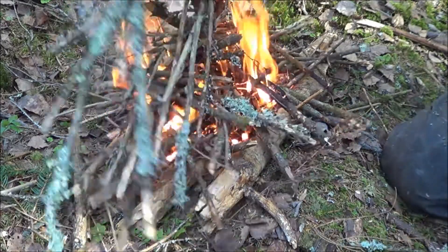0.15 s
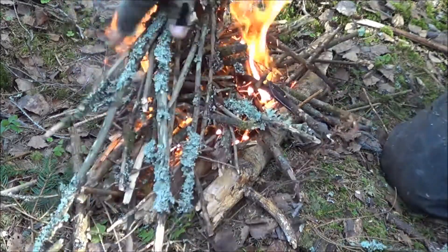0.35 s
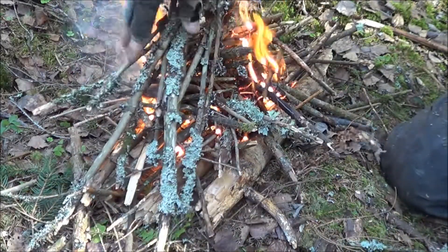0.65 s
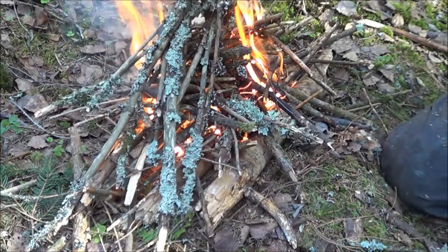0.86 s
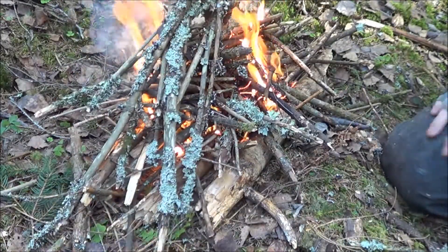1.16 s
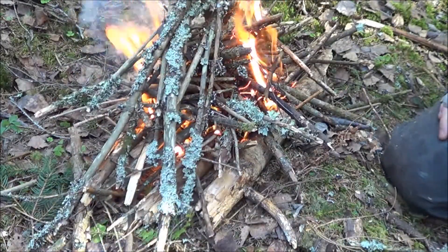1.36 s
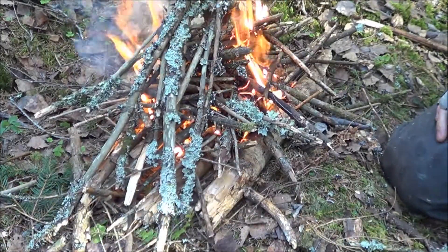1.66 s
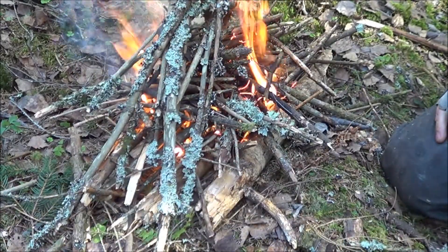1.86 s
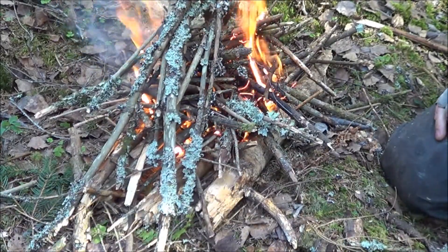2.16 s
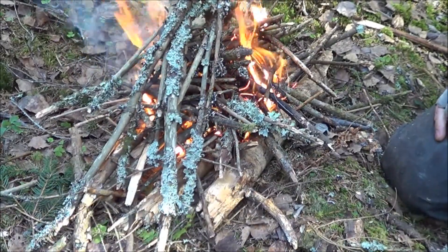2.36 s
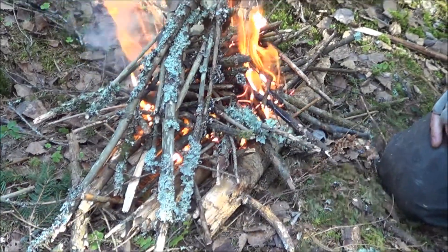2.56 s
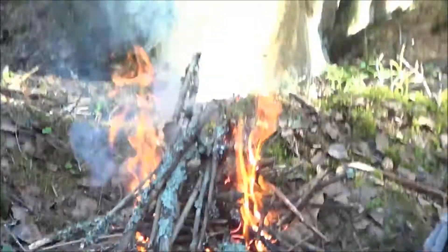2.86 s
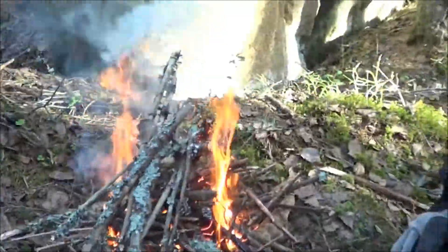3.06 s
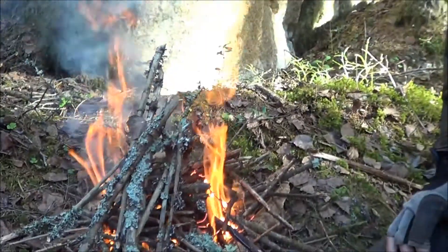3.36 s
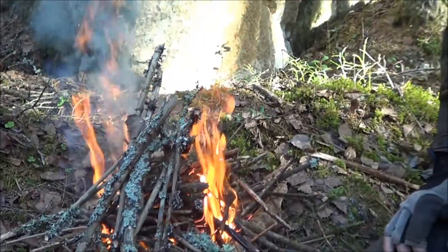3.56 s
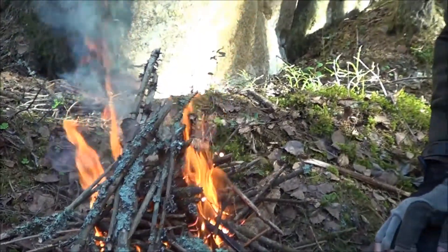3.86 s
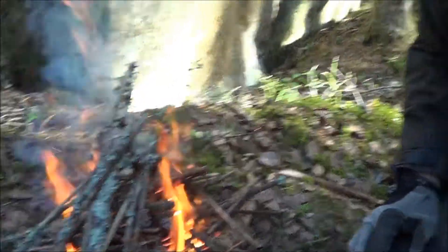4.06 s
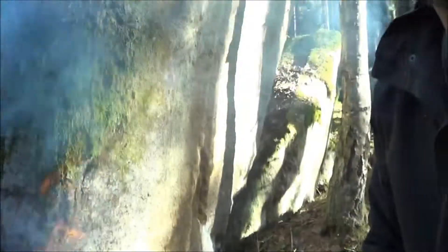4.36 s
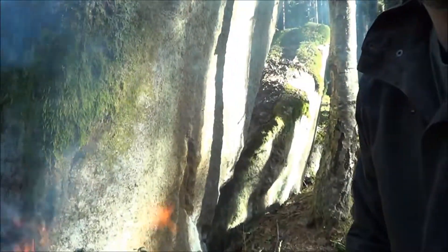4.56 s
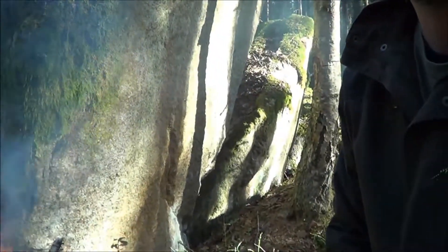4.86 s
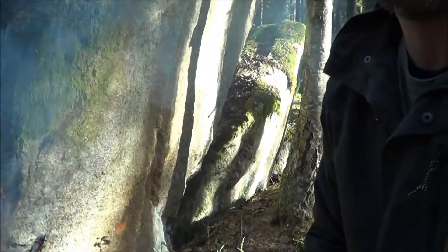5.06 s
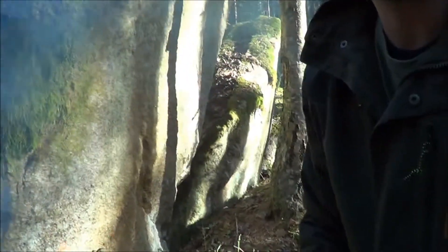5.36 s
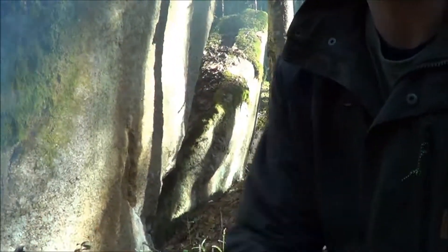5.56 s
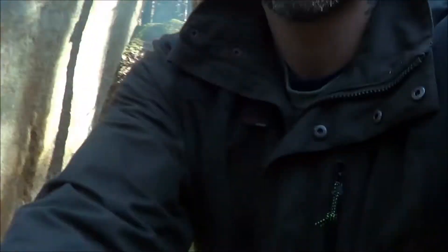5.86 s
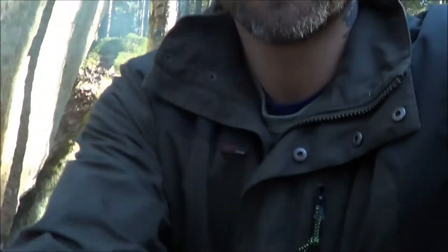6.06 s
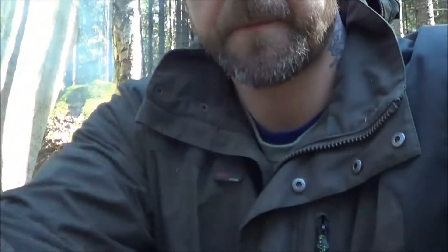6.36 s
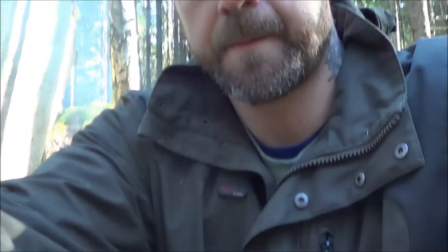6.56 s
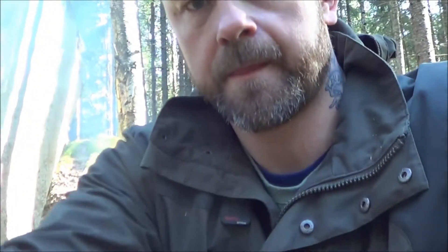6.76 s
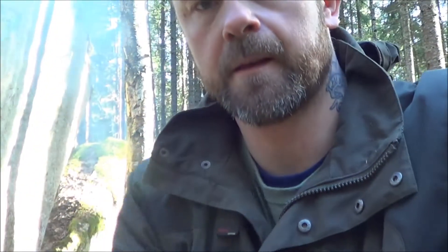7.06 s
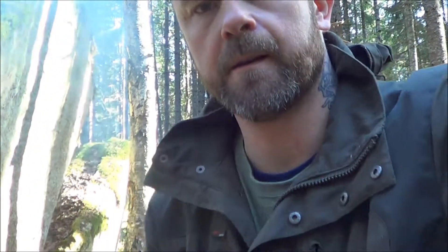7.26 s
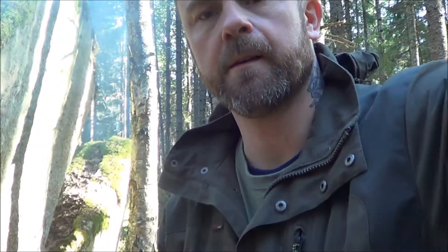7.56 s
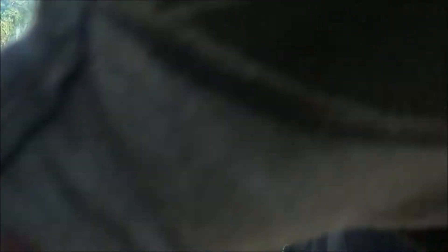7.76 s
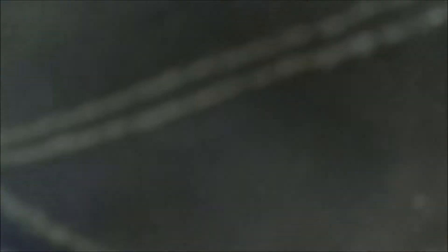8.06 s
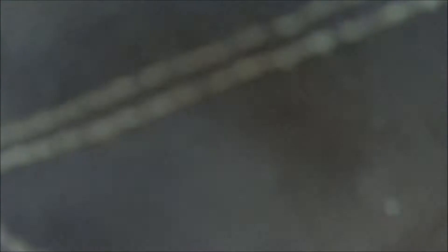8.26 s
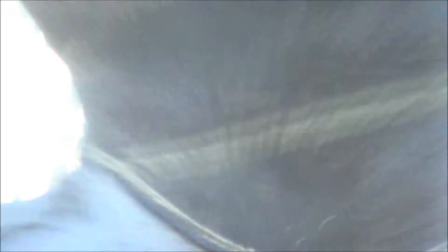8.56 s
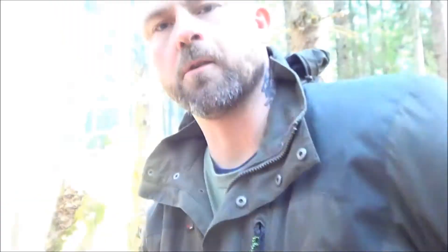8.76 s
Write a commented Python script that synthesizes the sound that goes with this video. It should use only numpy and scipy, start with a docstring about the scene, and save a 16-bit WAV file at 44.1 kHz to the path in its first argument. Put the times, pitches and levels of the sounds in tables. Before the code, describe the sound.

Close to a small wood fire in a forest, twigs snap brightly and irregularly with faint ticks between. Quick sleeve swishes come first as sticks are laid on; then fingers rub, scrape, knock and briefly squeak on the hand-held camera as it is lifted and turned. Soft air hiss and low flame flutter stay underneath, with very faint bird peeps late on.

```python
"""A small stick fire on a forest floor, close to the two microphone ports of a hand-held camera.
Resin pockets burst and twigs crack: sharp noise bursts through resonances, with a short forest echo.
A sleeve swishes nearby as sticks are laid on: bright friction noise shaped by the swings of the arm.
The camera is lifted and turned: fingers rub, knock and squeak on its shell, heard through its resonances.
Under it lie the flutter of the flames and the hiss of the open air, both noise, and a far bird's sine peeps."""
import sys
import numpy as np
from scipy import signal
from scipy.fft import rfft, irfft, next_fast_len
from scipy.io import wavfile
from scipy.ndimage import uniform_filter1d, map_coordinates

SR = 44100
rng = np.random.default_rng(int(sys.argv[2]) if len(sys.argv) > 2 else 0)


def transcribe(u):
    """Save the signal u as a 16-bit wav file named by the first command-line argument.

    u: samples, shape (n,) or (channels, n), limited to [-1, 1]; the rate is SR.
    q: integer samples, one column per channel.
    """
    v = np.clip(np.atleast_2d(u).T, -1, 1)
    q = np.round(v * 32767).astype(np.int16)
    wavfile.write(sys.argv[1], SR, q)


N = 392922

# open air hiss, spectrum: f/Hz, relative level/dB
AIR_SPECTRUM = [(15, -50), (25, -10), (131, 10), (588, 15), (903, 6.5), (1280, 3.5), (2180, 10.5),
                (2930, 7), (3930, 11.5), (4620, 4), (10300, 4.5), (12100, 0), (15000, -2.5)]
# likeness of the left and right ports for spread sounds: f/Hz, likeness/1
PORT_LIKENESS = [(30, 0.9), (150, 1), (1000, 0.87), (4000, 1), (8000, 0.78), (15000, 1)]

# the hand shifting its hold on the camera: t/s, rub level/dB
GRIP_SHIFTS = [(0, -59.5), (1.4, -49.5), (1.68, -41.5), (1.92, -54), (2.45, -40.5), (2.8, -40), (3.08, -48),
               (3.95, -45), (4.3, -43.5), (4.88, -55), (5.8, -42.5), (6.15, -47), (6.78, -53.5),
               (7.25, -36.5), (7.58, -51), (8.42, -58), (8.7, -51.5), (8.91, -50)]
# separate slides of the hand over the shell: start t/s, length/s, low rub level/dB, scrape level/dB
HAND_SLIDES = [(0.214, 0.13, -59, -52), (1.174, 0.059, -48, -39.5), (1.51, 0.027, -37, -33.5),
               (1.703, 0.045, -56, -30.5), (2.038, 0.12, -41, -32), (2.202, 0.063, -39, -37),
               (2.328, 0.094, -48, -28), (2.452, 0.054, -28.5, -32.5), (2.686, 0.024, -30.5, -39),
               (2.899, .068, -29.5, -18.5), (3.199, 0.084, -53, -33.5), (3.306, 0.045, -35.5, -44),
               (3.477, 0.013, -42, -48), (3.567, 0.054, -27, -30), (3.674, 0.12, -45, -32),
               (3.73, 0.023, -31, -22), (4.028, 0.025, -34, -37), (4.162, 0.043, -44, -37),
               (4.592, 0.065, -60, -36.5), (5.308, 0.025, -35, -36), (5.773, .16, -49, -37),
               (6.61, .07, -63, -44.5), (7.155, 0.071, -33.5, -38.5), (7.295, 0.038, -46, -26.5),
               (7.351, 0.15, -53, -39.5), (8.505, 0.062, -40, -43.5), (8.73, 0.17, -42.5, -58)]
# resonances of the camera shell: f/Hz, width/Hz, level/dB
SHELL_MODES = [(262, 38, -15.5), (452, 300, -1.5), (659.6, 37, 1.5), (996, 123, 1.5), (1186, 50, -12.5),
               (1910, 610, -4), (2264, 64, -3.5), (3200, 170, -5), (3850, 78, -6.5)]
# low rub of skin, spectrum ahead of the shell: f/Hz, relative level/dB
SKIN_SPECTRUM = [(30, -35), (100, -15), (250, 0), (480, -1), (700, 2.5), (1100, -1), (1500, -4),
                 (2500, -17)]
# gritty scrape of skin, spectrum ahead of the shell: f/Hz, relative level/dB
SCRAPE_SPECTRUM = [(600, -7), (1050, 2), (1500, 6), (2400, 5.5), (3500, 1), (5500, 2), (7000, -3.5),
                   (12000, -26)]
# shell vibration reaches the left port first: f/Hz, lead over the right/rad
LEFT_PORT_LEAD = [(100, 0.086), (700, 0.91), (1700, 1.2), (2500, 0.55), (5000, 1.72), (8000, 1.2)]

# swings of the sleeve: peak t/s, rise time constant/s, fall time constant/s, level/dB
SLEEVE_SWINGS = [(.09, 0.1, 0.086, -32.5), (0.251, 0.036, 0.065, -22.5), (.33, 0.034, 0.053, -28.5),
                 (.52, 0.0092, 0.074, -24.5), (1.219, 0.072, 0.08, -33.5), (2.11, 0.035, 0.027, -27.5),
                 (3.255, 0.024, 0.019, -26), (4.94, 0.011, 0.022, -38.5), (5.56, 0.09, 0.25, -43.5),
                 (5.86, 0.095, 0.097, -26), (6.3, 0.16, 0.17, -39.5), (7.1, 0.21, 0.36, -43.5),
                 (7.461, .045, 0.029, -29), (7.65, 0.056, 0.056, -38), (8.88, 0.18, .1, -39.5)]
# cloth brushing on cloth, spectrum: f/Hz, relative level/dB
CLOTH_SPECTRUM = [(40, -30), (150, -17.5), (1000, -9.5), (3500, -8), (5000, -7.5), (7500, -2.5),
                  (10500, -0.5), (12500, -2), (15500, -11)]

# loudest bursts in the wood: t/s, crack level/dB over 5 ms, crack centre f/Hz, twig ring level/dB over 5 ms
# (both levels ahead of a fixed trim)
WOOD_BURSTS = [(0.1615, -26.5, 9300, -25.5), (0.2189, -20.5, 9200, -45), (.366, -25.5, 10800, -30.5),
               (0.6657, -23, 11100, -32), (.7308, -16, 10700, -31), (0.935, -29.5, 10900, -37.5),
               (1.014, -24, 11900, -48), (1.5906, -20, 11700, -48), (1.693, -23, 11100, -30),
               (1.7686, -21.5, 10100, -28), (1.7769, -20.5, 9400, -28), (1.947, -27.5, 12200, -41),
               (2.1978, -32, 7500, -26), (2.2573, -33, 7500, -33), (2.3374, -27, 7070, -17.5),
               (2.4494, -22, 7360, -19), (2.473, -26.5, 6000, -23), (2.5057, -25, 7200, -23),
               (2.5276, -22, 6050, -26), (2.5738, -18, 8800, -9.5), (2.6872, -23.5, 9750, -10.5),
               (2.785, -26, 10200, -40), (2.8637, -21.5, 7800, -26), (2.8712, -19.5, 7640, -35),
               (3.0042, -24, 7000, -45), (3.0275, -18.5, 9600, -34), (3.1747, -17.5, 12000, -23.5),
               (3.1818, -17.5, 9500, -34), (3.2437, -33, 7400, -18), (3.319, -22, 10500, -28),
               (3.354, -25.5, 8060, -44), (3.369, -29, 11500, -45), (3.3877, -22.5, 9800, -31),
               (3.672, -24, 11000, -40), (3.7314, -20, 11200, -17), (3.7717, -19, 9500, -19),
               (3.858, -21, 5050, -19.5), (4.0345, -22, 5700, -13), (4.1534, -23, 8660, -29),
               (4.227, -19.5, 9800, -28), (4.2349, -23, 7500, -18.5), (4.241, -20, 9300, -21.5),
               (4.2797, -23, 7800, -20), (4.375, -30, 8700, -29.5), (4.456, -20.5, 7760, -28),
               (4.5059, -21, 10000, -31), (4.5467, -26.5, 7200, -18), (4.5979, -22, 8300, -44),
               (4.7397, -24.5, 10400, -31), (5.0258, -29, 11000, -37), (5.05, -25, 8600, -30.5),
               (5.1968, -32, 10500, -47), (5.2104, -24.5, 7550, -33), (5.31, -26, 11400, -21),
               (5.383, -20, 7900, -31), (5.4393, -20.5, 8600, -24), (5.5242, -20, 8500, -16.5),
               (5.5923, -26, 9000, -49), (5.6485, -20, 9900, -40), (5.7052, -24, 7400, -23),
               (5.9377, -19, 8950, -23.5), (6.0184, -18.5, 10100, -30), (6.1733, -21, 7940, -37),
               (6.2895, -20, 9000, -23.5), (6.573, -23.5, 10200, -24.5), (6.813, -25, 8000, -25.5),
               (6.9652, -20, 11600, -19.5), (7.0027, -27, 9900, -46), (7.014, -28.5, 7500, -40),
               (7.4162, -24, 8100, -25), (7.489, -25, 8560, -25.5), (7.8016, -30.5, 9800, -58),
               (8.061, -23, 10200, -25.5), (8.119, -21.5, 10300, -41), (8.2828, -22.5, 7900, -31),
               (8.298, -25.5, 7240, -23.5), (8.4621, -30.5, 9900, -31), (8.5874, -22, 9600, -29.5),
               (8.796, -29, 8200, -35), (8.8584, -18, 8400, -20.5)]
# bearing of fire and sleeve: t/s, left minus right level/dB
FIRE_BEARING = [(0, 1.5), (1.5, -1), (5.5, 1.3), (8.9, 3)]
# echo off ground and trunks: f/Hz, time to fall by 60 dB/s
FOREST_DECAY = [(200, 0.1), (2000, 0.053), (8000, 0.074), (15000, 0.023)]

# fingers bumping the camera: t/s, thud level/dB over 5 ms ahead of a fixed trim, thud centre f/Hz,
# hard click relative to the thud/dB
FINGER_KNOCKS = [(1.192, -33.5, 700, 0), (1.473, -35.5, 800, -3), (1.514, -25.5, 700, -11),
                 (1.65, -15.5, 870, -2.5), (2.035, -28.5, 990, 4.5), (2.048, -13, 930, -29),
                 (2.338, -17.5, 1120, -3), (2.414, -22.5, 980, -19), (2.451, -17.5, 610, -29),
                 (2.484, -21, 960, -9), (2.528, -22, 990, -1), (2.563, -25.5, 730, 3),
                 (2.576, -20, 990, -2), (2.91, -22, 1190, -10), (2.933, -27, 1010, 14),
                 (2.945, -30, 170, -10), (3.02, -28.5, 885, -21), (3.137, -35, 890, 8.5),
                 (3.232, -23.5, 1080, 5.5), (3.274, -28, 374, -19), (3.336, -28.5, 1040, -2.5),
                 (3.58, -22, 1100, -26), (3.858, -25.5, 690, 1.5), (4.05, -26, 800, 11),
                 (4.091, -20, 735, 5), (4.175, -26, 990, 1), (4.184, -25, 980, 4), (4.235, -36, 150, -18),
                 (4.413, -40.5, 900, 4), (4.48, -35, 800, 11.5), (4.951, -23.5, 1110, 1),
                 (5.128, -34.5, 950, -4), (5.15, -27, 980, -10), (5.17, -20.5, 870, -13),
                 (5.235, -19.5, 900, -12.5), (5.273, -33, 550, -18), (5.317, -17, 680, -14),
                 (5.354, -19.5, 970, -13), (5.385, -25, 980, -26), (5.718, -25, 980, -12),
                 (5.827, -21.5, 1050, -0.5), (5.872, -28.5, 580, 0), (5.982, -34.5, 238, -22),
                 (6.224, -21, 850, -10), (6.272, -28.5, 736, 2.5), (6.865, -27.5, 553, -8),
                 (6.887, -29.5, 670, 2.5), (7.096, -28, 586, -14), (7.161, -27.5, 875, 13.5),
                 (7.218, -32, 970, 13.5), (8.045, -32.5, 920, -16), (8.158, -17, 770, -20),
                 (8.517, -31, 287, -8)]
# a fingertip catches and squeaks on the shell: start t/s, end t/s, mean pitch f/Hz, peak level/dB before wavering
FINGER_SQUEAKS = [(2.074, 2.164, 1044, -25), (3.551, 3.63, 1140, -22), (7.279, 7.333, 1010, -26.5)]
# faint peeps of a far bird: t/s, peak level/dB
BIRD_PEEPS = [(6.7, -44), (6.745, -52), (6.787, -59), (8.265, -40), (8.345, -45)]

GRIP_SCRAPE_DB = -1.5  # scrape against rub while the hold shifts
SLIDE_ATTACK_S, SLIDE_RELEASE_S = 0.0074, 0.0096  # time constants
BRUSH_S = 0.0051  # a finger brushes the shell just before a bump: rise time constant of that rub
SKID_DB, SKID_S = -14.5, 0.019  # and skids on after it: rub level against the bump, decay time constant
SKID_SCRAPE_DB = -25.5  # a hard landing scrapes as well: level against its click
JUDDER_PER_S, JUDDER_DB = 130, -14.5  # separate catches of the skin: rate, level against the scrape
CUFF_DB = -8.5  # the cuff brushes along with every scrape: level against the scrape
SLEEVE_REST_DB = -55  # cloth creeping while the arm is still
TWIG_HZ = 2420  # central pitch of a twig listed with ring and crack equally loud
TWIG_DB_PER_OCTAVE = 96  # a thicker twig rings louder and lower
TWIG_SCATTER_OCTAVES = 0.19
ECHO_DB = -20  # forest echo against the fire
TAPS_PER_S, TAP_DB, TAP_SCATTER_DB = 5.2, 7, 8.5  # light random taps: rate, level over the rub, spread either way
TAP_HZ, TAP_CLICK_DB = 830, 0.5  # their thud centre and relative click
TOP_HZ = 15900  # the camera's band limit
SIDES = np.array([[.5], [-.5]])  # left and right halves of a difference between the ports


def amp(db):
    """Decibels to gain."""
    return 10 ** (np.asarray(db) / 20)


def unit(x):
    """Scale to rms 1."""
    return x / np.sqrt(np.mean(x ** 2) + 1e-20)


def burst(x):
    """Scale a short sound to the energy of 5 ms at rms 1."""
    return x * np.sqrt(SR * .005 / (np.sum(x ** 2) + 1e-20))


def along(points, hz):
    """Read (f/Hz, value) points on a log frequency axis."""
    f, v = np.transpose(points)
    return np.interp(np.log(hz + 1), np.log(f + 1), v)


def curves(rows):
    """One value per sample for each column after the time."""
    s, *cols = np.transpose(rows)
    return [np.interp(np.arange(N) / SR, s, c) for c in cols]


def wobble(rate):
    """A smooth random curve, rate knots a second."""
    knots = rng.standard_normal(int(N * rate / SR) + 4)
    return map_coordinates(knots, [np.arange(N) * rate / SR])


def stroke(start, length, attack, release):
    """Envelope that swells up to start, holds for its length and dies away."""
    t = np.arange(N) / SR - start
    return np.exp(np.minimum(t, 0) / attack - np.maximum(t - length, 0) / release)


def together(envelopes):
    """Unrelated contacts add in power."""
    return np.sqrt(sum(e ** 2 for e in envelopes))


def filtered(x, response):
    """x times a complex response of frequency."""
    n = x.shape[-1]
    m = next_fast_len(n + 2048)  # spare room for ringing
    return irfft(rfft(x, m) * response(np.fft.rfftfreq(m, 1 / SR)), m)[..., :n]


def resonance(f, hz, width):
    """Causal response of one damped mode."""
    return 1j * f * width / (hz * hz - f * f + 1j * f * width)


def stereo(pair, colour):
    """Colour two unrelated signals and blend them into left and right as alike as the table says, rms 1."""
    def mid_side(f):
        turn = np.arccos(np.clip(along(PORT_LIKENESS, f), -1, 1)) / 2
        return colour(f) * np.array([np.cos(turn), np.sin(turn)])

    mid, side = filtered(pair, mid_side)
    return unit(np.array([mid + side, mid - side]))


def add(out, s, sound, lag, pan_db):
    """Place a short sound at time s; lag (samples) and level differ between the two ports."""
    pair = amp(SIDES * pan_db) * filtered(sound, lambda f: np.exp(-2j * np.pi * f * SIDES * lag / SR))
    start = max(round(s * SR), 0)
    out[:, start:start + len(sound)] += pair[:, :N - start]


def friction(rate, spread_db, smooth, patchy_db):
    """Tiny slips of uneven size over smooth sliding noise; the colour shifts as the contact moves."""
    sizes = amp(spread_db * np.clip(rng.standard_normal(N), -2, 2))
    slips = (rng.random(N) < rate / SR) * sizes
    grit = unit(slips * rng.choice([-1, 1], (2, N))) + smooth * rng.standard_normal((2, N))
    z = signal.stft(grit, nperseg=512)[2]
    patches = uniform_filter1d(rng.standard_normal(z.shape[1:]), size=3, axis=0)  # over frequency
    patches = uniform_filter1d(patches, size=12, axis=1)  # over time
    return signal.istft(z * amp(patchy_db * unit(patches)), nperseg=512)[1][:, :N]


def shell(f, grip_db=0):
    """The camera shell carries touches to the microphones; the grip changes the strength of each mode."""
    grips = grip_db * rng.standard_normal(len(SHELL_MODES))
    return sum(amp(db + grip) * resonance(f, hz, width) for (hz, width, db), grip in zip(SHELL_MODES, grips))


def air():
    """The steady hiss of the open air, partly diffuse, and the low, unsteady flutter of the flames."""
    hiss = stereo(rng.standard_normal((2, N)), lambda f: amp(along(AIR_SPECTRUM, f)))
    diffuse_colour = lambda f: amp(along(AIR_SPECTRUM, f)) * resonance(f, 1600, 5500)
    diffuse = unit(filtered(rng.standard_normal((2, N)), diffuse_colour))  # unrelated left and right
    flames = stereo(rng.standard_normal((2, N)), lambda f: resonance(f, 156, 250) ** 2)
    flames_db = -59.0 + 0.77 * wobble(32)
    return amp(-54.5) * hiss + amp(-52.5) * diffuse + amp(flames_db) * flames


def pressure():
    """Strength of rub and scrape: the shifting hold, the slides, and the skid around each listed bump."""
    grip_db, = curves(GRIP_SHIFTS)
    rubs, scrapes = [amp(grip_db)], [amp(grip_db + GRIP_SCRAPE_DB)]
    for start, length, rub_db, scrape_db in HAND_SLIDES:
        slide = stroke(start, length, SLIDE_ATTACK_S, SLIDE_RELEASE_S)
        rubs.append(amp(rub_db) * slide)
        scrapes.append(amp(scrape_db) * slide)
    thuds, clicks = np.zeros((2, N))
    for s, db, _, click_db in FINGER_KNOCKS:
        thuds[round(s * SR)] = amp(db + SKID_DB)
        clicks[round(s * SR)] = amp(db + click_db + SKID_SCRAPE_DB)
    t = np.arange(-(SR // 5), SR // 5 + 1) / SR
    skid = np.exp(np.minimum(t, 0) / BRUSH_S - np.maximum(t, 0) / SKID_S)
    rubs.append(signal.fftconvolve(thuds, skid, mode="same"))
    scrapes.append(signal.fftconvolve(clicks, skid, mode="same"))
    return together(rubs), together(scrapes)


def hand(rub_gain, scrape_gain):
    """Skin slips on the shell: a low rub, a gritty scrape and separate catches, all through its resonances."""
    stiff = lambda f: f ** 2 / (f ** 2 + 130 ** 2)  # the small, stiff shell passes little bass
    rub_colour = lambda f: amp(along(SKIN_SPECTRUM, f)) * (abs(shell(f)) + 0.74) * stiff(f)
    scrape_colour = lambda f: amp(along(SCRAPE_SPECTRUM, f)) * (abs(shell(f)) + 0.45) * stiff(f)
    judder_colour = lambda f: amp(along(SCRAPE_SPECTRUM, f)) * (shell(f) + 0.14)
    rub = stereo(friction(rate=500, spread_db=2.5, smooth=0.54, patchy_db=4.0), rub_colour)
    scrape = stereo(friction(rate=1000, spread_db=3, smooth=0.45, patchy_db=4.5), scrape_colour)
    catches = friction(rate=JUDDER_PER_S, spread_db=6.0, smooth=0.044, patchy_db=4.0)
    judder = stereo(catches, judder_colour)
    catch_db = 2.2 * wobble(120)  # the skin catches and lets go
    return amp(catch_db) * (rub_gain * rub + scrape_gain * (scrape + amp(JUDDER_DB) * judder))


def sleeve(scrape_gain):
    """Stiff cloth brushes thread over thread in a fine, bright hiss, as the arm swings or the hand slides."""
    swings = [amp(db) * stroke(s, 0, rise, fall) for s, rise, fall, db in SLEEVE_SWINGS]
    motion = together(swings + [amp(CUFF_DB) * scrape_gain, amp(SLEEVE_REST_DB)])
    brushing = friction(rate=4000, spread_db=5.5, smooth=0.43, patchy_db=2.1)
    threads = stereo(brushing, lambda f: amp(along(CLOTH_SPECTRUM, f)))
    folds_db = 1.5 * wobble(100)
    return motion * amp(folds_db) * threads


def fracture(t, life, echo_s, tail_db, tail_life):
    """A sharp break, its bounce off nearby sticks, and a splintering that dies in a few ms."""
    decay = np.exp(-t / life) + amp(tail_db) * np.exp(-t / tail_life)
    splinters = rng.standard_normal(len(t)) * decay
    splinters[0] += 3.6
    splinters[int(echo_s * SR)] -= 2.4
    return splinters


def snaps():
    """Each burst gives a bright crack and briefly rings the twig it breaks from."""
    out, t = np.zeros((2, N)), np.arange(SR // 20) / SR
    for s, crack_db, crack_hz, ring_db in WOOD_BURSTS:
        length, bounce, lag, place, thin = np.clip(rng.standard_normal(size=5), -2, 2)
        octaves = (crack_db - ring_db) / TWIG_DB_PER_OCTAVE + TWIG_SCATTER_OCTAVES * thin
        ring_hz = TWIG_HZ * 2 ** octaves
        pan_db = 1.5 * place
        echo_s = .00065 * np.exp(.3 * bounce)
        blow = fracture(t, life=0.00025 * np.exp(0.2 * length), echo_s=echo_s, tail_db=0.0, tail_life=0.0015)
        puff = lambda f: 0.18 * resonance(f, 1050, 3300)  # the escaping gas gives the crack some body
        crack = filtered(blow, lambda f: resonance(f, crack_hz, 0.38 * crack_hz) - puff(f))
        twig = lambda f: resonance(f, ring_hz, .5 * ring_hz) * resonance(f, ring_hz, 5.4 * ring_hz)
        ring = filtered(fracture(t, life=0.0011, echo_s=echo_s, tail_db=-24.5, tail_life=0.014), twig)
        add(out, s, amp(crack_db + 1.8) * burst(crack), -.2 + 0.26 * lag, pan_db)
        # the twig sounds along its whole length, so its lag scatters more
        add(out, s, amp(ring_db - 2.9) * burst(ring), -1 + lag, pan_db)
    return out


def embers():
    """Faint, bright ticks at random moments from all over the glowing pile."""
    t = np.arange(SR // 50) / SR
    out = np.zeros((2, N))
    for when, size, pitch, lag in rng.random((110, 4)):
        blow = fracture(t, life=0.00077, echo_s=0.0013, tail_db=-19, tail_life=.003)
        hz = 6000 * 2 ** pitch
        tick = burst(filtered(blow, lambda f: resonance(f, hz, .5 * hz)))
        tick_db = -45.5 + 20.7 * size ** 2  # few are loud
        add(out, when * N / SR, amp(tick_db) * tick, lag - .7, 0)
    return out


def forest(x):
    """Ground and trunks scatter a short, thin echo: decaying noise, 90 samples late."""
    hz, t, z = signal.stft(rng.standard_normal((2, SR // 4)), SR, nperseg=256)
    decay = amp(-60 * t / along(FOREST_DECAY, hz)[:, None])
    tail = signal.istft(z * decay, SR, nperseg=256)[1]
    late = np.pad(x, ((0, 0), (90, 0)))
    return signal.fftconvolve(late, tail / np.linalg.norm(tail[0]), axes=1)[:, :N]


def taps():
    """Light bumps at random moments, as strong as the hold is restless."""
    draws = rng.random((round(TAPS_PER_S * N / SR), 2))
    times = draws[:, 0] * N / SR
    levels = np.interp(times, *np.transpose(GRIP_SHIFTS)) + TAP_DB + TAP_SCATTER_DB * (2 * draws[:, 1] - 1)
    return [(s, db, TAP_HZ, TAP_CLICK_DB) for s, db in zip(times, levels)]


def knocks():
    """A fingertip lands with a short scuff: a thud in the shell's low modes, and a click if it lands hard."""
    out, t = np.zeros((2, N)), np.arange(SR // 12) / SR
    for s, db, thud_hz, click_db in FINGER_KNOCKS + taps():
        push = rng.standard_normal(len(t)) * (1 - np.exp(-t / 0.00016)) * np.exp(-t / 0.0046)
        pad = lambda f: resonance(f, thud_hz, 0.31 * thud_hz)  # a softer, broader contact sounds lower
        thud = filtered(push, lambda f: (shell(f, grip_db=3.5) + 0.32 * resonance(f, 130, 260)) * pad(f))
        strike = rng.standard_normal(len(t)) * np.exp(-t / 0.0028)
        click = filtered(strike, lambda f: (shell(f) + 0.093) * resonance(f, 2350, 3200) ** 2)
        knock = amp(db + 1.24) * (burst(thud) + amp(click_db) * burst(click))
        add(out, s, knock, rng.normal(), 2 * rng.normal())
    return out


def squeaks():
    """Stick-slip of a fingertip sings as one sine tone that wavers in pitch and level."""
    t, out = np.arange(N) / SR, np.zeros(N)
    for start, end, hz, db in FINGER_SQUEAKS:
        progress = np.clip((t - start) / (end - start), 0, 1)
        press = np.sqrt(np.abs(np.sin(np.pi * progress)))
        phase = 2 * np.pi * np.cumsum(hz * (1 + 0.0559 * wobble(290))) / SR
        out += amp(db + 1.86 * wobble(130)) * press * np.sin(phase)
    return out


def bird():
    """Short, pure peeps from far off in the trees."""
    t = np.arange(N) / SR
    peeps = sum(amp(db) * np.exp(-((t - s) / 0.0048) ** 2) for s, db in BIRD_PEEPS)
    return peeps * np.sin(2 * np.pi * 2510 * t)


def scene():
    """Fire and sleeve shift bearing as the camera turns, ending left; the handling comes through the shell."""
    fire = snaps() + embers()
    rub_gain, scrape_gain = pressure()
    pan_db, = curves(FIRE_BEARING)
    outside = (fire + amp(ECHO_DB) * forest(fire) + sleeve(scrape_gain)) * amp(SIDES * pan_db)
    touches = knocks() + hand(rub_gain, scrape_gain) + squeaks()
    handling = filtered(touches, lambda f: np.exp(1j * SIDES * along(LEFT_PORT_LEAD, f)))
    return outside + handling + bird() + air()


def record(dry):
    """The camera rounds off the highest peaks and cuts steeply above its band limit."""
    rounded = dry / (1 + np.abs(dry / .95) ** 4) ** (1 / 4)
    return filtered(rounded, lambda f: 1 / (1 + (f / TOP_HZ) ** 120))


dry = scene()
out = record(dry)
transcribe(out)
```